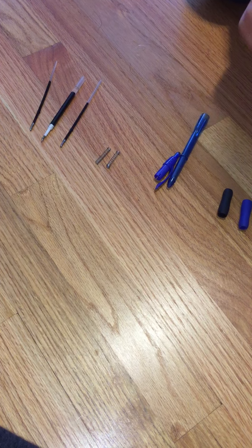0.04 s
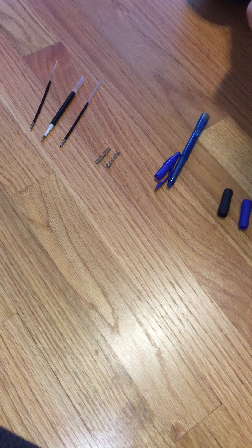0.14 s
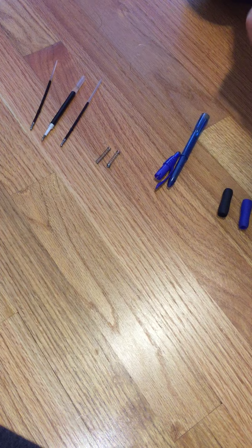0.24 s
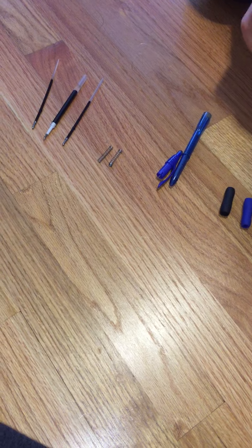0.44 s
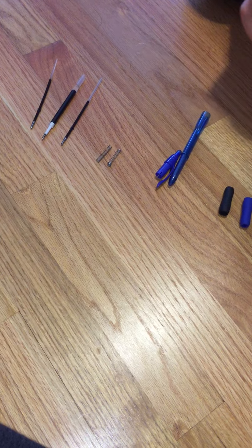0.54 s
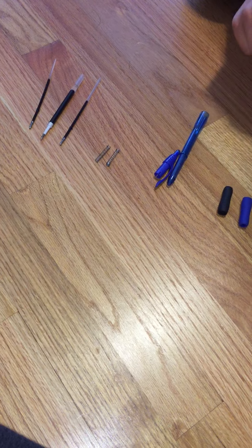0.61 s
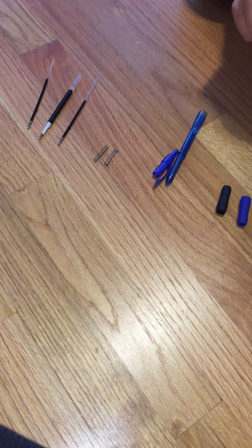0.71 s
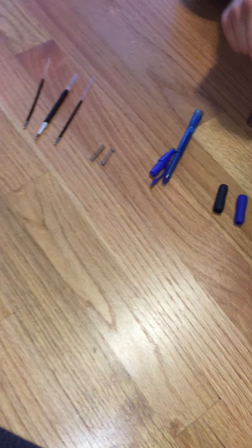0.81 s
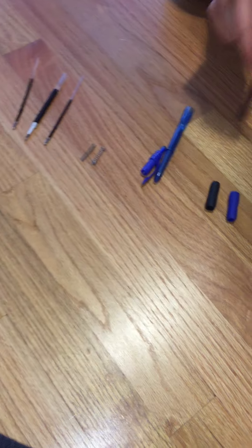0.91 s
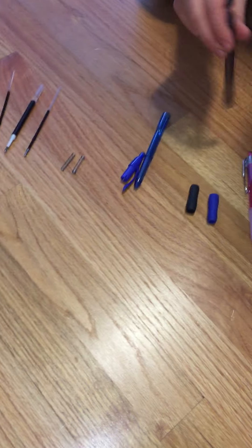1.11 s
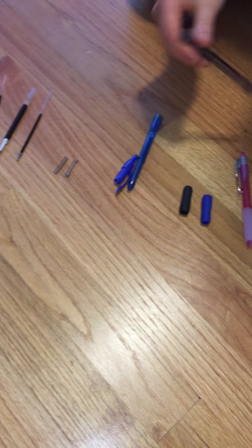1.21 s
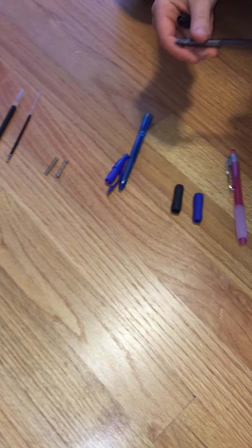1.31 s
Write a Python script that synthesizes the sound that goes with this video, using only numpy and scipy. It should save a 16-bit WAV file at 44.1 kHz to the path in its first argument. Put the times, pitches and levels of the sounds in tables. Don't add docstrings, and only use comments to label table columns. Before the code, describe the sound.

A retractable pen clicks six times at a steady quick pace, growing louder, in a quiet room

```python
import sys
import numpy as np
from scipy import signal
from scipy.fft import rfft, irfft
from scipy.io import wavfile

SR = 44100
rng = np.random.default_rng(int(sys.argv[2]) if len(sys.argv) > 2 else 0)


def dump(signal):
    limited = np.clip(np.atleast_2d(signal).T, -1, 1)
    pcm = np.round(limited * 32767).astype(np.int16)
    wavfile.write(sys.argv[1], SR, pcm)


def gain_from_db(level_db):
    decades = np.asarray(level_db, float) / 20
    return 10 ** decades


N = 59535


def add(mix, start_s, sound):
    part = mix[round(start_s * SR):][:len(sound)]
    part += sound[:len(part)]


def peaked(x, db):
    return gain_from_db(db) * x / abs(x).max()


def read_curve(points, hz):
    f, value = np.transpose(points)
    return np.interp(np.log(hz + 1), np.log(f + 1), value)


def draw_luck():
    return rng.standard_normal(300)


def ring(modes, wander):
    rise_cycles, detune = 0.31, 0.012
    t = np.arange(SR // 8) / SR
    out = np.zeros(len(t))
    for k, ((hz, db, t60), w) in enumerate(zip(modes, wander)):
        envelope = gain_from_db(db - 60 * t / t60) * (1 - np.exp(-t * hz / rise_cycles))
        out += (-1) ** k * envelope * np.sin(2 * np.pi * hz * (1 + detune * w) * t)
    return out


def chatter(x, luck):
    decay_s, level_db = 0.00082, 2.5
    t = np.arange(len(luck)) / SR
    burst = gain_from_db(level_db) * luck * np.exp(-t / decay_s) / np.sqrt(decay_s * SR / 2)
    return x + np.convolve(x, burst)[:len(x)]


def click(peak_db, snap_db, barrel_db, boards_db, luck):
    # (frequency [Hz], level [dB], T60 [s])
    board_modes = [(252, -18.5, 0.036), (362, -38.5, 0.13), (481.5, -12.5, 0.018), (682, -8, 0.026),
                   (926, -4, 0.015), (1189, -4.5, 0.025)]
    # (frequency [Hz], level [dB], T60 [s])
    tube_modes = [(1545, 2.5, 0.022), (1788, -1.5, 0.015), (2232, 1, 0.018)]
    # (frequency [Hz], level [dB], T60 [s])
    barrel_modes = [(2665, 0.5, 0.018), (2910, 4, 0.013), (3469, -3, 0.013), (4087, -3, 0.0096),
                    (4545, -6, 0.008)]
    contact_s, latch_s, low_cut_hz = 0.00004, 0.0006, 215
    attack_feed_s, ring_feed_db = 0.00078, -7
    latch_db, latch_feed_db, spike_feed_db = -8.5, -5, -4

    t = np.arange(64) / SR
    push = t / contact_s * np.exp(-t / contact_s)
    body = -gain_from_db(boards_db) * ring(board_modes, luck)
    body -= ring(tube_modes, luck[7:])
    body += gain_from_db(barrel_db) * ring(barrel_modes, luck[23:])
    body = np.convolve(body, push)[:len(body)]
    body = signal.lfilter(*signal.butter(2, low_cut_hz, "high", fs=SR), body)

    t = np.arange(len(body)) / SR
    direct = peaked(body * np.minimum(t / latch_s, 1), 0)
    feed = direct * (np.exp(-np.maximum(t - latch_s, 0) / attack_feed_s) + gain_from_db(ring_feed_db))
    latch = gain_from_db(latch_db + snap_db) * snap(luck)
    spike = np.linalg.norm(latch) * np.array([-.5, 1, -.5])
    add(direct, latch_s, latch)
    add(feed, latch_s, gain_from_db(latch_feed_db) * latch)
    add(feed, latch_s, gain_from_db(spike_feed_db) * spike)
    return gain_from_db(peak_db) * direct, gain_from_db(peak_db) * feed


def snap(luck):
    # (frequency [Hz], level [dB], T60 [s])
    latch_modes = [(5576, 8, 0.0062), (6960, -4, 0.0072), (7650, 2.5, 0.0077), (9260, 6.5, 0.0046),
                   (9950, 0, 0.0066), (11720, -0.5, 0.0039), (13600, -17, 0.0027), (13000, 4.5, 0.0034),
                   (14400, -21, 0.0022)]
    crack_db, crack_s = 0, 0.0011
    out = peaked(chatter(ring(latch_modes, luck[14:]), luck[30:]), 0)
    paired = luck[30::2].repeat(2)[::-1]
    grit = np.diff(paired + luck[30:])
    t = np.arange(len(grit)) / SR
    add(out, 0, peaked(grit * np.exp(-t / crack_s), crack_db))
    return out


def add_clicks(mix, near, far):
    # (time [s], level [dB], snap [dB], barrel [dB], boards [dB])
    presses = [
        (.2063, -21, -15, -8.5, 0.5),
        (.3863, -14.5, -8, -5, 1.5),
        (.5635, -12, -3, -4.5, 0),
        (.7369, -12.5, -3.5, -4, 0.5),
        (.9081, -10.5, -3, -1.5, 1.5),
        (1.0720, -7.5, -2.5, 1.5, 1.5),
    ]
    for k, (start_s, *levels) in enumerate(presses):
        direct, feed = click(*levels, draw_luck())
        turn = k * np.pi / 3
        room = np.cos(turn) * near + np.sin(turn) * far
        add(mix, start_s, direct)
        add(mix, start_s, signal.fftconvolve(feed, room))


def tick(peak_db, hz, snap_db, luck):
    t60_s, spread = 0.0093, 1.5
    modes = [(hz, 0, t60_s), (hz * spread, -5, t60_s), (hz * spread ** 2, -14, t60_s)]
    touch = peaked(chatter(ring(modes, luck), luck[30:]), 0)
    return gain_from_db(peak_db) * (touch + gain_from_db(snap_db) * snap(luck))


def add_ticks(mix):
    # (time [s], level [dB], pitch [Hz], snap [dB])
    touches = [
        (.1782, -38, 2800, -20),
        (.192, -55, 3300, -20),
        (.886, -47, 2300, -12),
        (1.032, -45, 2300, -8),
        (1.337, -45, 3700, -8),
        (1.3395, -34, 2400, -10),
        (1.342, -40, 2550, -9),
    ]
    # (time [s], level [dB], pitch [Hz], snap [dB])
    bounces = [
        (.394, -44, 2600, 0),
        (.5715, -38, 2200, -2),
        (.7505, -32, 2600, -5),
        (.9225, -27, 2400, -7),
        (1.088, -30, 2200, -4),
    ]
    for start_s, *settings in touches + bounces:
        add(mix, start_s, tick(*settings, draw_luck()))


def add_rattles(mix):
    # (time [s], level [dB])
    shivers = [
        (.785, -43),
        (.797, -45),
        (.806, -48),
        (.814, -47),
        (.821, -49),
        (1.284, -53),
        (1.2925, -57),
        (1.3065, -52),
        (1.315, -53),
        (1.3305, -54),
    ]
    # (frequency [Hz], level [dB], T60 [s])
    spring_modes = [(1500, -6, .008), (3000, -5, .008), (5400, -1, .007), (6400, 0, .007),
                    (9000, -12, .006), (13800, -15, .03)]
    for start_s, peak_db in shivers:
        add(mix, start_s, peaked(ring(spring_modes, draw_luck() / 2), peak_db))


def thump(peak_db, phase):
    hz, rise_s, t60_s = 65, 0.014, 0.2
    t = np.arange(SR // 3) / SR
    envelope = gain_from_db(peak_db - 60 * t / t60_s) * (1 - np.exp(-(t / rise_s) ** 2))
    return envelope * np.sin(2 * np.pi * (hz * t + phase))


def add_thumps(mix):
    # (time [s], level [dB])
    bumps = [
        (.21, -57),
        (.38, -63),
        (.455, -59),
        (.568, -54),
        (.745, -66),
        (.912, -51),
        (.98, -59),
        (1.074, -47),
        (1.15, -53),
        (1.335, -66),
    ]
    for start_s, peak_db in bumps:
        add(mix, start_s, thump(peak_db, rng.random()))


def room_tail():
    # (frequency [Hz], T60 [s])
    band_t60 = [(100, 0.49), (300, 0.16), (700, 0.46), (1500, 0.45), (3000, 0.43), (6000, 0.53),
                (9000, 0.2), (14000, 0.47)]
    # (frequency [Hz], level [dB])
    tail_colour = [(250, 7), (650, 1), (1100, 1.5), (2400, -2), (4800, -3), (6200, -5.5), (8000, 3),
                   (14000, -16)]
    # (frequency [Hz], width [Hz], level [dB])
    resonances = [(358, 38, 16.5), (1060, 86, 6), (1490, 76, -4), (2518, 65, 7.5)]
    # (delay [s], level [dB])
    reflections = [(.0032, -17), (.0075, -30), (.0150, -30), (.0225, -23)]
    tail_db, rise_s, spacing = -2.5, 0.004, 12

    taps = np.zeros(SR)
    at = np.arange(0, SR - spacing, spacing)
    taps[at + rng.integers(0, spacing, len(at))] = rng.choice([-1., 1.], len(at))
    hz, t, z = signal.stft(taps, SR, nperseg=256)
    decay = gain_from_db(-60 * t / read_curve(band_t60, hz)[:, None])
    out = signal.istft(z * decay, SR, nperseg=256)[1][:SR]
    out = out * (1 - np.exp(-(np.arange(SR) / SR / rise_s) ** 2))

    f = np.fft.rfftfreq(SR, 1 / SR)
    lift_db = sum(db / (1 + (2 * (f - peak_hz) / width) ** 2) for peak_hz, width, db in resonances)
    colour = gain_from_db(tail_db + lift_db + read_curve(tail_colour, f))
    out = irfft(rfft(out / np.linalg.norm(out)) * colour, SR)
    for delay_s, db in reflections:
        add(out, delay_s, gain_from_db(db) * np.ones(1))
    return out


def air():
    # (frequency [Hz], level [dB])
    air_colour = [(15, -63), (25, -11), (49, -1.5), (124, -12), (154, -11.5), (273, -14), (902, -21),
                  (8830, -29), (16500, -37)]
    air_db, rumble_db = -70.5, -85
    rumble_hz, rumble_width_hz = 65, 15
    hz = np.fft.rfftfreq(N, 1 / SR)
    a, b = rng.standard_normal((2, N))
    hiss = irfft(rfft(a) * gain_from_db(read_curve(air_colour, hz)), N)
    rumble = irfft(rfft(b) / (1 + ((hz - rumble_hz) / rumble_width_hz) ** 4), N)
    return gain_from_db(air_db) * hiss / hiss.std() + gain_from_db(rumble_db) * rumble / rumble.std()


def scene():
    mix, near, far = air(), room_tail(), room_tail()
    add_clicks(mix, near, far)
    add_thumps(mix)
    small = np.zeros(N)
    add_ticks(small)
    add_rattles(small)
    small_room = gain_from_db(-2) * signal.fftconvolve(small, near)[:N]
    return (mix + small + small_room)[None]


def top_cut(x):
    return signal.sosfilt(signal.butter(12, 17020, fs=SR, output="sos"), x)


def record(dry):
    edge_hz, mic_low_hz = 16000, 42
    treble_cut = signal.firwin(101, edge_hz, window=("kaiser", 9), fs=SR)
    limited = signal.oaconvolve(dry, treble_cut[None], "same")
    limited = signal.lfilter(*signal.butter(2, mic_low_hz, "high", fs=SR), limited)
    return top_cut(limited)


dry = scene()
out = record(dry)
dump(out)
```